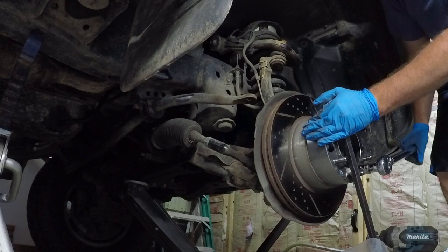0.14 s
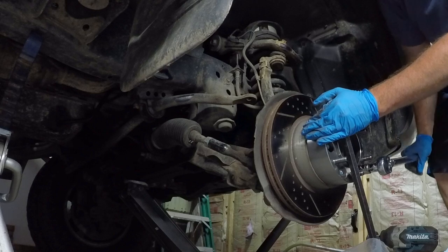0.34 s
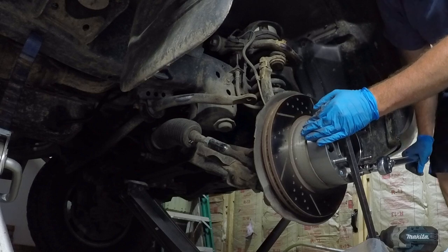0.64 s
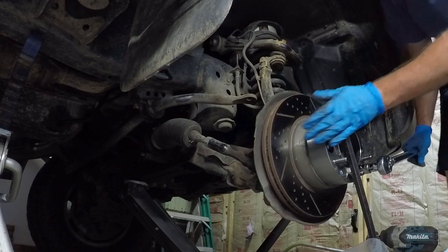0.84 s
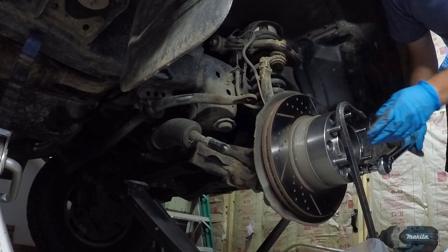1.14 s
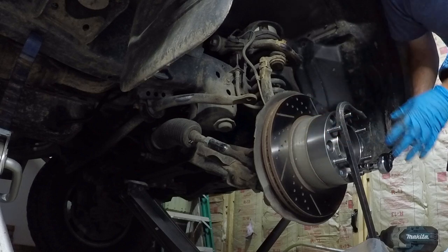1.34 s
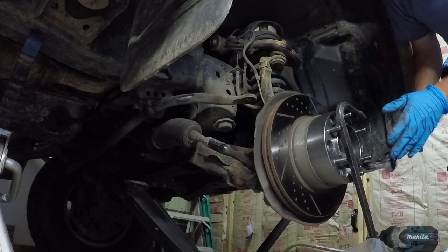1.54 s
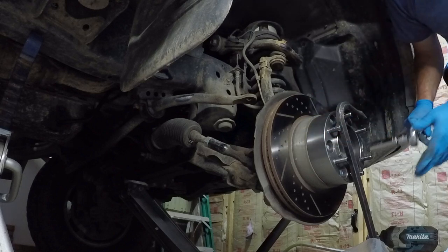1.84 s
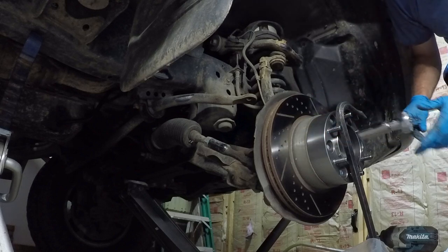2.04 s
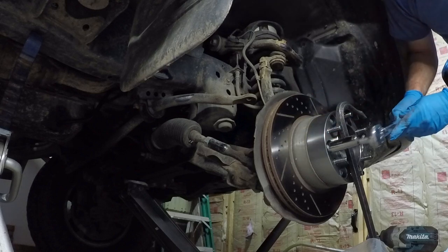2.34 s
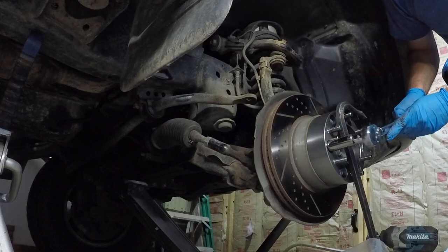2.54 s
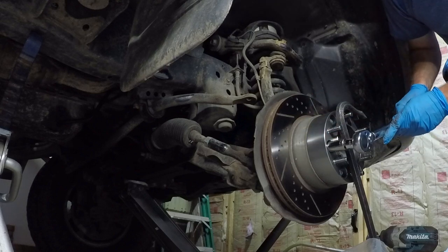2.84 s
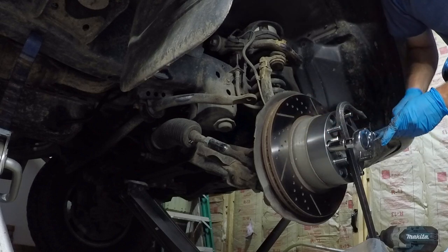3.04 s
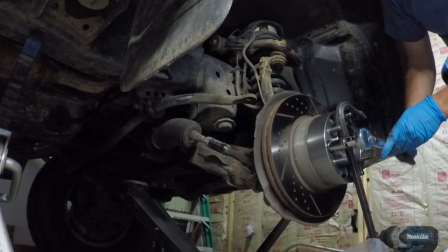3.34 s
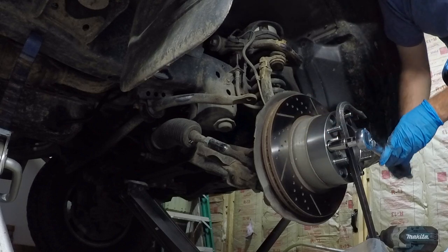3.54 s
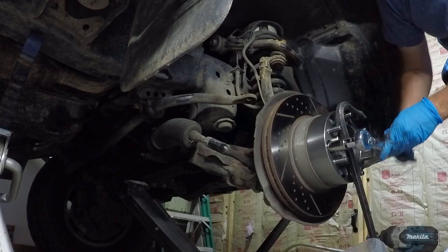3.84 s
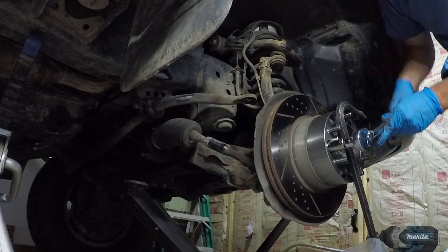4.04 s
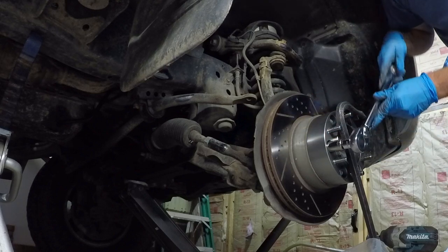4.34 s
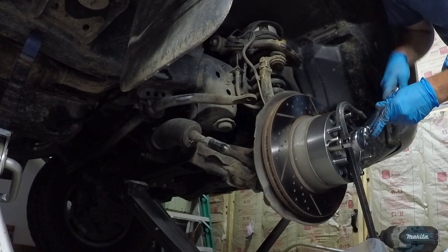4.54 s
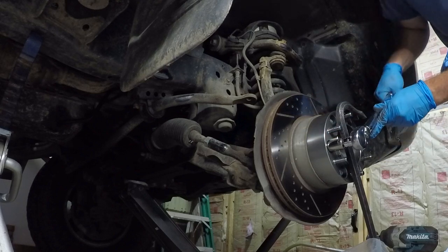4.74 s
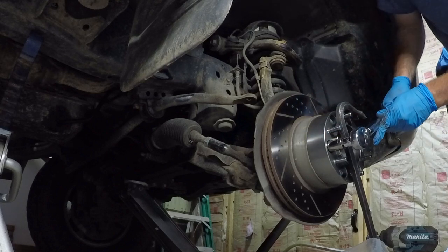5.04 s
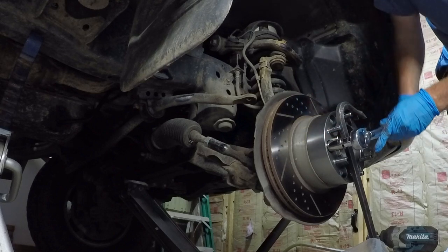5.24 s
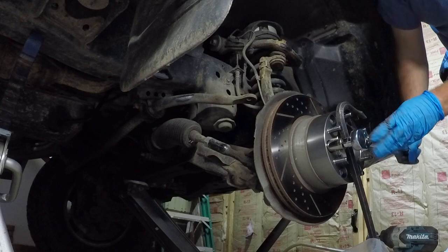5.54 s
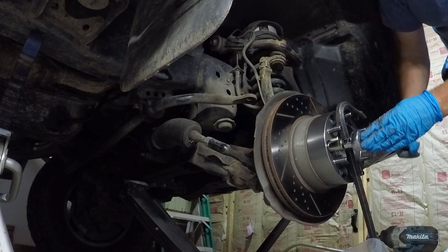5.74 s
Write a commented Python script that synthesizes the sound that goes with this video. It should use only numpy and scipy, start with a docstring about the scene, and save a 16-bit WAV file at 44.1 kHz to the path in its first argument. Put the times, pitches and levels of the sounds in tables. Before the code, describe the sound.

Two loud, sharp wrench clicks jolt a car's suspension, then a socket clinks lightly between metal nuts and a ratchet snaps, over faint ventilation.

```python
"""Torque wrench on a wheel hub

A click-type wrench tightens nuts under the wheel arch of a car in a small garage. It breaks over and snaps
back, each time jolting the suspension; then the socket is pulled off, clinks onto the next nut and the ratchet
catches. Decaying modes give the rings, shaped noise bursts the cracks, scrapes and snaps, and filtered noise
the deep rumble and the ventilation, which also has faint steady tones. Echoes of arch and garage follow."""
import sys
import numpy as np
from scipy import signal
from scipy.fft import rfft, irfft
from scipy.io import wavfile

SR = 44100
rng = np.random.default_rng(int(sys.argv[2]) if len(sys.argv) > 2 else 0)


def put_to_file(sound):
    """Save the sound as 16-bit audio at rate SR, in the file named by the first command-line argument."""
    columns = np.atleast_2d(sound).T  # one column per channel
    safe = np.clip(columns, -1, 1)
    whole_steps = np.round(safe * 32767)
    wavfile.write(sys.argv[1], SR, whole_steps.astype(np.int16))


N = 259749
AGE = np.arange(2 ** 15) / SR   # seconds since a blow

# All colours are relative spectra, and all mode levels are relative to the level of the blow.
# rush of air through the ventilation: hz, level_db
AIR_COLOUR = [(12, 9), (35, -13), (70, -7), (130, -7.5), (185, 3.5), (240, -1.5), (295, 0.5), (380, -7.5),
              (700, -10.5), (1100, -13.5), (2000, -18), (6000, -27.5), (9500, -34), (15500, -43.5)]
# steady motor tones: pitch_hz, rms_level_db
MOTOR_TONES = [(59.2, -65), (99.9, -66), (177.6, -64), (602.9, -68), (716, -71.5), (990.5, -68),
               (1163, -71)]
# the wrench breaks over, then snaps back: start_s, crack_db, ring_db, jolt_db
CLICKS = [(0.4001, -7.5, -21.5, -25.5), (0.7667, -8, -27, -24)]
# colour of the crack on breaking over: hz, level_db
BREAK_COLOUR = [(300, -16.5), (800, -13), (1300, -14.5), (1780, -13), (2000, -0.5), (2900, -6.5),
                (4400, 3.5), (5200, -7), (6100, 2.5), (7000, -8), (7750, 0), (9200, -10), (11500, -11),
                (15500, -14.5)]
# colour of the crack on snapping back: hz, level_db
RESET_COLOUR = [(300, -16.5), (800, -15.5), (1600, -9), (1950, -4), (2300, -5), (3400, 2.5), (4600, -0.5),
                (5600, -3), (6500, -3), (7100, -7), (8700, 1), (10100, 0.5), (11200, -11.5), (15500, -15)]
# modes of the wrench's steel tube and head: pitch_hz, break_db, reset_db, t60_s
WRENCH_MODES = [(1850, -8.5, -9.5, 0.25), (2072, 0.5, -18, 0.1707), (2058, -21, -20, 0.71),
                (2138, -6.5, -15, .42), (2550, -8, -19.5, 0.18), (2605, -3.5, 3, 0.22),
                (2939, -5, -1.5, 0.29), (3106, -5, -12.5, 0.26), (3274, -15, 9.5, 0.12),
                (3520, -14, 10.5, 0.13), (3600, -15, 5, 0.15), (3840, -12, 5, 0.11),
                (4153, -30.5, -36, 0.71), (4150, -6, -12, 0.11), (4140, -3.5, -6.5, 0.15),
                (4320, -3, -2, 0.12), (5200, -16, 0, 0.23), (5254, -36.5, -39.5, 1.3),
                (7750, -3, -19.5, 0.052), (8760, -10.5, -0.5, .07), (9856, 9, -0.5, 0.18),
                (10460, 5, -28, 0.14)]
# near surfaces of the wheel arch: delay_s, share of the burst's amplitude
ARCH_ECHOES = [(.0029, .3), (.0046, 0.36), (.0063, .45), (0.0121, .22)]
# reverberation time of the garage: hz, t60_s
GARAGE_T60 = [(150, 0.72), (800, .42), (2200, 0.27), (4500, .28), (8000, 0.22), (15000, .2)]
# strong modes of hub and suspension: pitch_hz, level_db, t60_s
SUSPENSION_MODES = [(198.6, 0.5, .22), (236, -10.5, .3), (262, -6.5, 0.59), (373.7, -3, 0.3)]
# blur of the suspension's many weaker modes: hz, level_db
THUD_COLOUR = [(90, -23.5), (140, -18.5), (180, -0.5), (260, -0.5), (320, -7.5), (410, -3), (500, -16.5),
               (800, -21), (1500, -40.5), (6000, -79.5)]
# modes of socket and stud, ringing freely: pitch_hz, level_db, t60_s
SOCKET_MODES = [(926, -18, 0.13), (1100, -23, 0.05), (1402, -17.5, 0.24), (1675, -16, 0.35),
                (1844, -7.5, 0.18), (1856, 3.5, 0.1), (2130, -19, 0.18), (2139, -16.5, 0.27),
                (2240, -12.5, 0.4), (2610, -24, 0.29), (3540, -27, 0.097), (3645, -2, 0.095),
                (3630, -4.5, 0.035), (3695, -2.5, 0.15), (3880, -15, 0.092), (4522, -14.5, 0.2),
                (4550, -17, 0.11), (4840, -11, .1), (7360, -20, .14)]
# cluster of high modes of the nut: multiple of its ping, level_db, t60_s
NUT_MODES = [(.975, -8, 0.033), (0.992, -16, .04), (1, -0.5, 0.052), (1.002, -34, 0.64), (1.011, -4, .05),
             (1.035, -14, .04)]
# the ping rises and is choked as the socket is pushed home: time_s, pitch_hz, share of the nut's t60
PING_COURSE = [(1.63, 10480, 0.98), (2.84, 10600, 0.75), (3.28, 11100, 0.43)]
# centres of the ranges that a touch excites: low, middle, high (two) and ping, in hz
RANGE_HZ = [1900, 3500, 7000, 9300, 10400]
# colour of the scrape, before the touch weights its ranges: hz, level_db
TICK_COLOUR = [(300, -15), (900, -5.5), (1400, 0), (1850, 3), (2250, 4), (2900, -0.5), (3650, 0.5),
               (4500, -1.5), (5600, -2), (7500, -8.5), (9000, -7), (9800, -16), (10800, -11), (12500, -32),
               (15500, -37)]
# socket knocks against nut; an edge hit trades low ring for ping, a hit on the open rim brings out
# the bell-like middle modes: start_s, strength_db, edge_db, bell_db, contact_s
KNOCKS = [(1.245, -57.5, -17, -3, .018), (1.6266, -35, 12, 8.5, 0.0019), (2.4914, -40.5, -35, -2, .0016),
          (2.8411, -34, 5.5, -1, 0.0078), (2.905, -50, 0, -3, .002), (3.2528, -41, 2.5, 12.5, 0.0016),
          (4.227, -44.5, -4, -2.5, .003), (5.842, -55, -18, -7, .015)]
# the socket slides along the nut before it knocks: start_s, strength_db, edge_db, contact_s
SLIDES = [(1.592, -51.5, 5, 0.019), (4.187, -47, 1, 0.0083)]
# the socket drops back onto the nut after a knock: start_s, strength_db
SETTLES = [(2.6125, -45), (2.896, -41), (3.317, -40)]
# the ratchet pawl slides and drops: start_s, level_db
PAWL_SNAPS = [(4.377, -42), (4.385, -27)]
# colour of the pawl's snap: hz, level_db
PAWL_COLOUR = [(300, -20.5), (900, -28), (1350, -7), (1850, 5.5), (2400, -5.5), (2950, 4), (4200, -1.5),
               (5500, 0.5), (6600, -7), (7800, -4.5), (8650, 7.5), (9300, 0.5), (11500, -3), (15500, -13)]


def from_db(db):
    """Level and amplitude: twenty decibels are a factor of ten."""
    return 10 ** (np.asarray(db) / 20)


def at_hz(points, hz):
    """Logarithmic frequency scale: a table is read between its points along equal pitch steps."""
    known, values = np.transpose(points)
    return np.interp(np.log(np.maximum(hz, 1)), np.log(known), values)


def noise(colour, size):
    """Spectral shaping: white noise is weighted by the colour and scaled to rms 1."""
    gain = from_db(at_hz(colour, np.fft.rfftfreq(size, 1 / SR)))
    x = irfft(rfft(rng.standard_normal(size)) * gain, size)
    return x / x.std()


def fade(t60):
    """Exponential damping: a free decay falls by 60 dB in t60 seconds."""
    return np.exp(-np.log(1000) * AGE / t60)


def swell(rise):
    """Build-up of energy during a contact, with time constant rise in seconds."""
    return 1 - np.exp(-AGE / rise)


def ring(hz, db, t60):
    """Modal superposition: one blow sets damped modes going together."""
    out = np.zeros(len(AGE))
    for pitch_hz, level_db, decay_s in zip(hz, db, t60):
        phase = rng.uniform(-1.1, 1)
        out += from_db(level_db) * fade(decay_s) * np.sin(2 * np.pi * pitch_hz * AGE + phase)
    return out


def tap(t60):
    """Hard impact: the instant steel meets steel is a few milliseconds of bright noise."""
    colour = [(500, -16), (2000, -13), (9000, 6), (12000, 4), (15500, -9)]
    return noise(colour, len(AGE)) * fade(t60)


def add(track, s, sound):
    """Linear superposition: a sound is added to the track from time s."""
    start = round(s * SR)
    track[start:start + len(sound)] += sound[:len(track) - start]


def garage_decay(colour, build_up):
    """Diffuse reverberation: coloured noise decays band by band, the bass lasting longest."""
    hz = np.fft.rfftfreq(len(AGE), 1 / SR)
    spectrum = rfft(noise(colour, len(AGE)))
    edges = np.geomspace(100, SR / 2, 11)
    decay = np.zeros(len(AGE))
    for low, high in zip(edges, edges[1:]):
        band = irfft(spectrum * (hz >= low) * (hz < high))
        decay += band * fade(at_hz(GARAGE_T60, np.sqrt(low * high)))
    return decay * swell(build_up)


def crack(colour, t60, room_db):
    """High modal density: heavily damped modes blur into a burst, which panels and garage return."""
    burst = noise(colour, len(AGE)) * fade(t60)
    out = burst.copy()
    for delay_s, share in ARCH_ECHOES:
        add(out, delay_s, share * burst)
    return out + from_db(room_db) * garage_decay(colour, build_up=0.0016)


def ventilation(air_db):
    """Broadband flow noise with steady sinusoidal motor tones."""
    t = np.arange(N) / SR
    out = from_db(air_db) * noise(AIR_COLOUR, N)
    for hz, rms_db in MOTOR_TONES:
        out += np.sqrt(2) * from_db(rms_db) * np.sin(2 * np.pi * (hz * t + rng.random()))
    return out


def rumble(rest_db, swell_db, attack_s, hold_s, release_s):
    """Amplitude envelope: noise at the bottom of hearing rises with the first click, holds and dies back."""
    corners = CLICKS[0][0] + np.cumsum([0, attack_s, hold_s, release_s])
    level_db = np.interp(np.arange(N) / SR, corners, [rest_db, swell_db, swell_db, rest_db])
    colour = [(4, 2), (11, 2), (24, -29.5), (45, -28.0), (100, -51.0), (2000, -120)]
    return from_db(level_db) * noise(colour, N)


def wrench(crack_t60, room_db):
    """Modal excitation: the toggle slams into one tube wall, then the other, weighting the modes anew."""
    cracks, rings = np.zeros((2, N))
    hz, break_db, reset_db, t60 = np.transpose(WRENCH_MODES)
    blows = zip(CLICKS, (BREAK_COLOUR, RESET_COLOUR), (break_db, reset_db))
    for (s, crack_db, ring_db, _), colour, mode_db in blows:
        add(cracks, s, from_db(crack_db) * crack(colour, crack_t60, room_db))
        add(rings, s, ring(hz, ring_db + mode_db, t60) * swell(.002))
    return cracks, rings


def suspension(rise, thud_db, thud_t60, shudder_db, shudder_delay, shudder_t60):
    """Inertia: each click jolts the hub, and the heavy car body follows with a deep shudder."""
    out = np.zeros(N)
    shudder_colour = [(12, 0.5), (45, 1), (65, -4), (100, -20.0), (500, -52.5), (4000, -100)]
    for s, _, _, jolt_db in CLICKS:
        thud = from_db(thud_db) * noise(THUD_COLOUR, len(AGE)) * fade(thud_t60)
        jolt = ring(*np.transpose(SUSPENSION_MODES)) + thud
        add(out, s, from_db(jolt_db) * jolt * swell(rise) ** 2)
        shudder = noise(shudder_colour, len(AGE)) * fade(shudder_t60)
        add(out, s + shudder_delay, from_db(jolt_db + shudder_db) * shudder * swell(rise))
    return out


def touch(s, db, edge_db, bell_db, contact):
    """Point of excitation: edge and bell of a hit set the level of each range and of the scrape."""
    low_db = db - 0.32 * edge_db      # dB of low ring lost per dB of edge
    middle_db = db + bell_db
    high_db = db - 2
    ping_db = db + edge_db
    rough_db = -0.29 * bell_db        # dB of scrape lost per dB of bell
    return s, low_db, middle_db, high_db, ping_db, rough_db, contact


def contacts(count, graze_gap_s, graze_bell_db, settle_contact_s):
    """Repeated contact: knocks, equally dull settling, and count grazes for each slide."""
    touches = [touch(*row) for row in KNOCKS]
    for s, db in SETTLES:
        # low, middle, high, ping and roughness
        touches.append((s, db - 1, db + 0.5, db - 7, db - 7, 0, settle_contact_s))
    for s, db, edge_db, contact in SLIDES:
        for k in range(count):
            touches.append(touch(s + k * graze_gap_s, db, edge_db, graze_bell_db, contact))
    return touches


def socket(tick_t60, tick_db, tap_db, room_db, ring_rise, seated_s, seated_share):
    """Selective excitation: the place of a touch weights the modes; load on the nut shifts its ping."""
    ticks, rings = np.zeros((2, N))
    hz, mode_db, t60 = np.transpose(SOCKET_MODES)
    multiple, nut_db, nut_t60 = np.transpose(NUT_MODES)
    ping_s, ping_pitches, ping_shares = np.transpose(PING_COURSE)
    tick_hz, colour_db = np.transpose(TICK_COLOUR)
    even_hz = np.fft.rfftfreq(len(AGE), 1 / SR)
    touches = contacts(count=2, graze_gap_s=.02, graze_bell_db=1, settle_contact_s=.005)
    for s, low_db, middle_db, high_db, ping_db, rough_db, contact in touches:
        strength = list(zip(RANGE_HZ, (low_db, middle_db, high_db, high_db, ping_db)))
        # pressed onto a nut, the socket rings shorter
        free = 1 if s < seated_s else seated_share
        socket_tones = ring(hz, mode_db + at_hz(strength, hz), free * t60)
        ping_hz = np.interp(s, ping_s, ping_pitches)
        ping_share = np.interp(s, ping_s, ping_shares)
        nut_tones = ring(multiple * ping_hz, nut_db + ping_db, ping_share * nut_t60)
        add(rings, s, (socket_tones + nut_tones) * swell(ring_rise + contact / 2))
        # the scrape is coloured by the same strengths, and its level follows from that colour
        colour = list(zip(tick_hz, colour_db + at_hz(strength, tick_hz)))
        gain = from_db(at_hz(colour, even_hz) + tick_db + rough_db)
        level = np.sqrt(np.mean(gain ** 2))
        scrape = crack(colour, tick_t60 + 2 * contact, room_db)
        add(ticks, s, level * scrape * swell(contact / 10))
        # the longer the contact, the weaker its first tap
        add(ticks, s, from_db(high_db + tap_db) * np.exp(-contact / 0.0062) * tap(0.011))
    return ticks, rings


def pawl(snap_t60, room_db, tap_db):
    """Impulsive contact: the pawl makes a bright, dry snap inside the ratchet head."""
    out = np.zeros(N)
    for s, db in PAWL_SNAPS:
        snap = crack(PAWL_COLOUR, snap_t60, room_db) + from_db(tap_db) * tap(0.0054)
        add(out, s, from_db(db) * snap)
    return out


def garage_echoes(ringing, level_db):
    """Convolution: the ringing excites a diffuse decay of unit energy."""
    garage = garage_decay([(100, 0), (15000, 0)], build_up=.002)
    return from_db(level_db) * signal.fftconvolve(ringing, garage / np.linalg.norm(garage))[:N]


def scene():
    """Superposition of the background, the tools at the hub and their echoes."""
    background = ventilation(air_db=-50.5)
    background += rumble(rest_db=-55, swell_db=-44, attack_s=.25, hold_s=1.1, release_s=.7)
    cracks, wrench_rings = wrench(crack_t60=0.039, room_db=-10.0)
    jolts = suspension(rise=.006, thud_db=-4.5, thud_t60=0.51,
                       shudder_db=-18.5, shudder_delay=.03, shudder_t60=.8)
    ticks, socket_rings = socket(tick_t60=0.027, tick_db=4, tap_db=1, room_db=-5.0,
                                 ring_rise=0.0023, seated_s=2.0, seated_share=0.69)
    snaps = pawl(snap_t60=0.033, room_db=-13, tap_db=-14)
    ringing = wrench_rings + from_db(1.5) * socket_rings
    echoes = garage_echoes(ringing, level_db=-10.5)
    return (background + cracks + jolts + ticks + snaps + ringing + echoes)[None]


def record(dry):
    """Saturation and band limiting: the loudest peaks are rounded and the top is cut."""
    rounded = 1.236 * np.tanh(dry / 1.17)
    low_pass = signal.ellip(10, .1, 80, 15700, fs=SR, output="sos")   # cutoff in Hz
    return signal.sosfilt(low_pass, rounded)


dry = scene()
out = record(dry)
put_to_file(out)
```